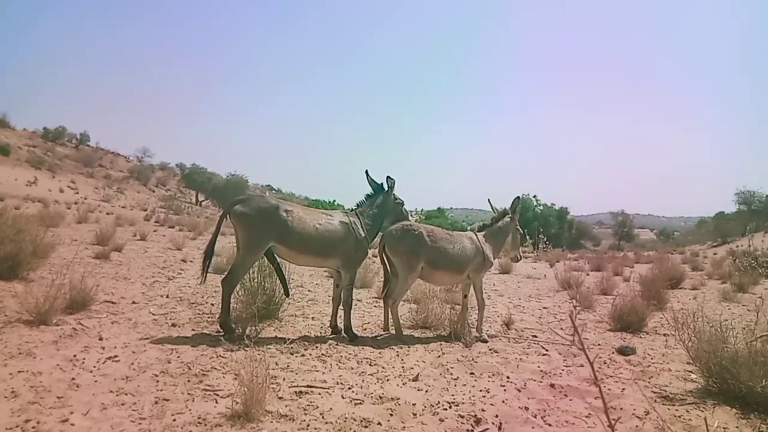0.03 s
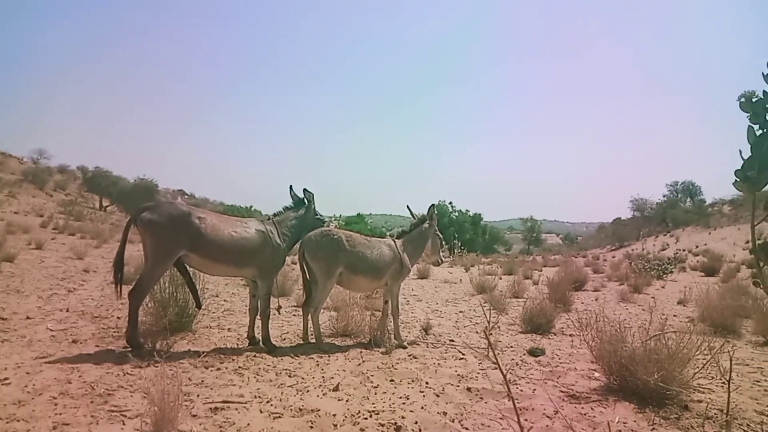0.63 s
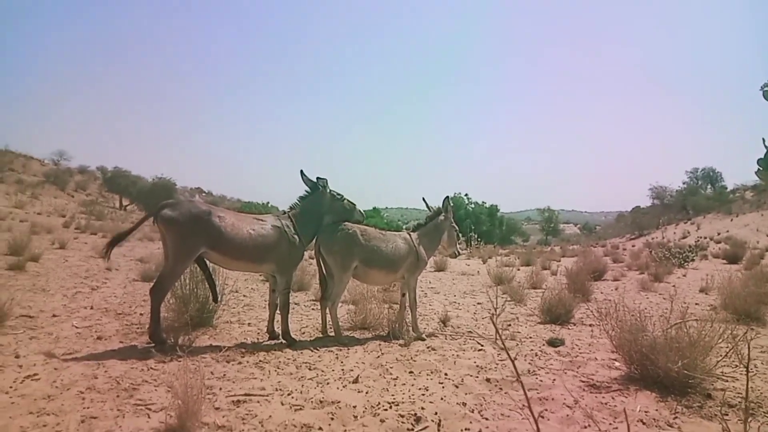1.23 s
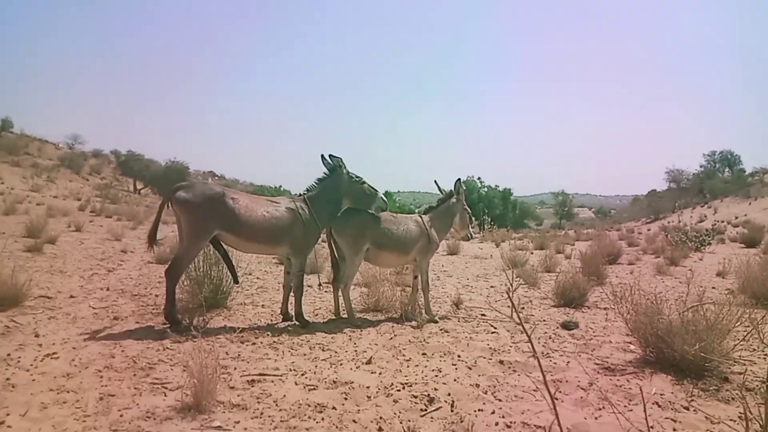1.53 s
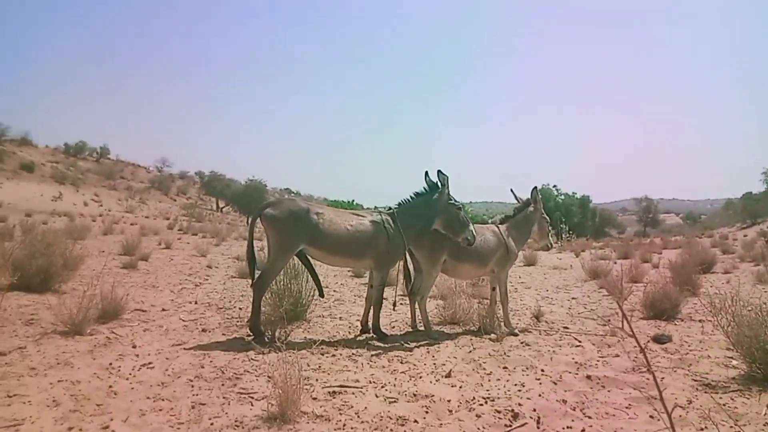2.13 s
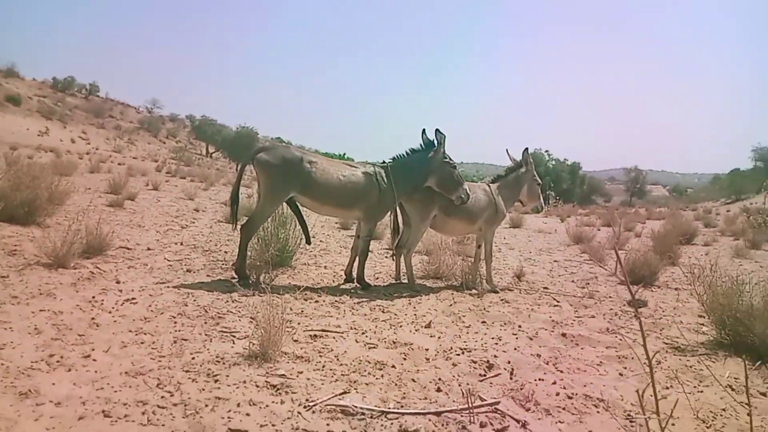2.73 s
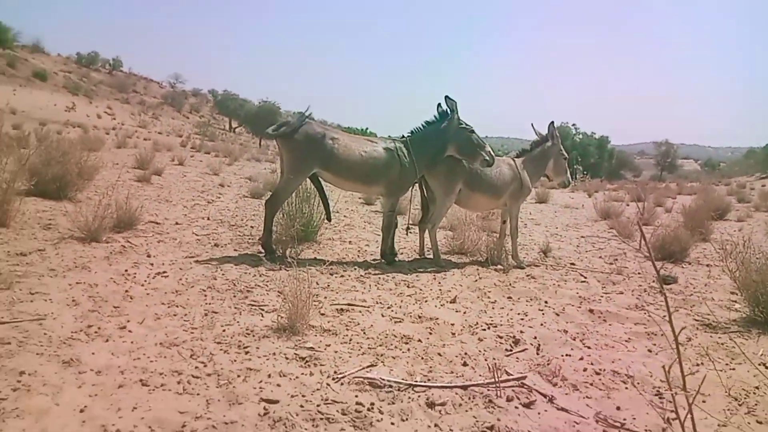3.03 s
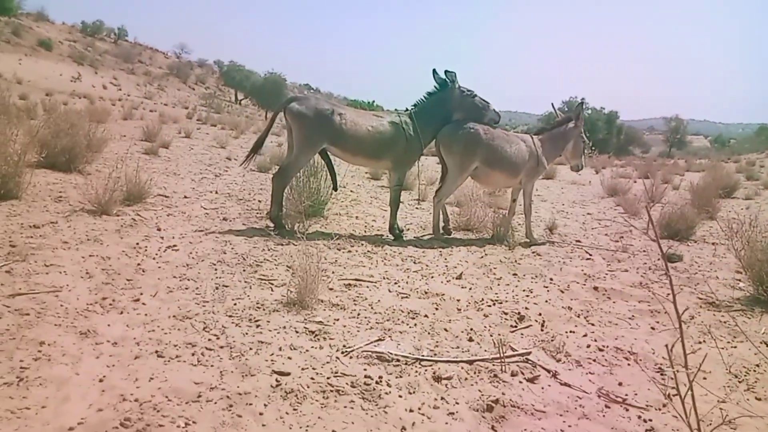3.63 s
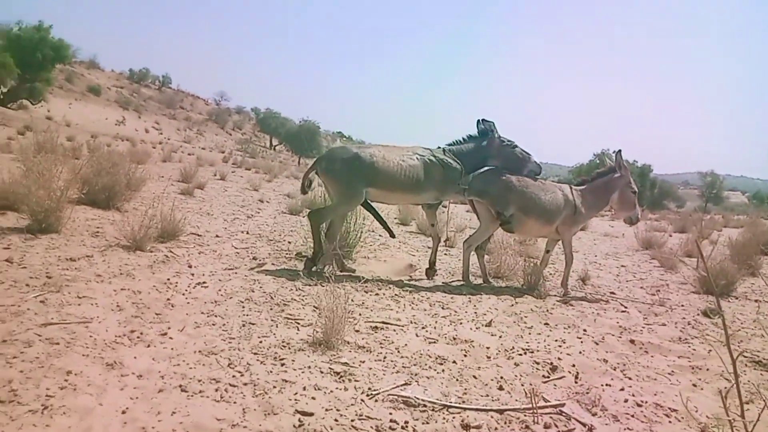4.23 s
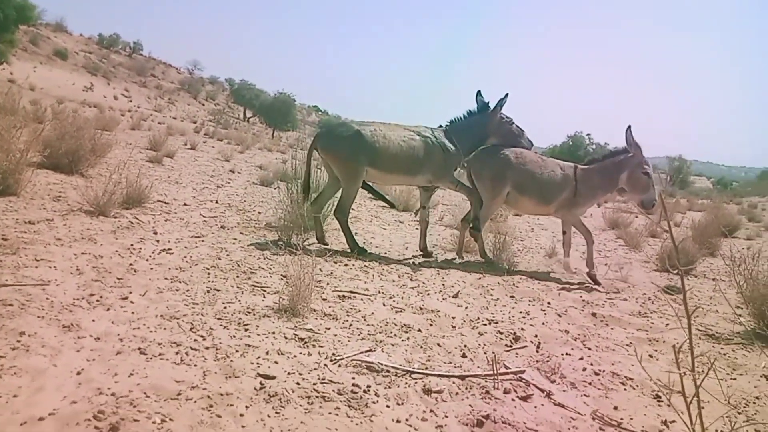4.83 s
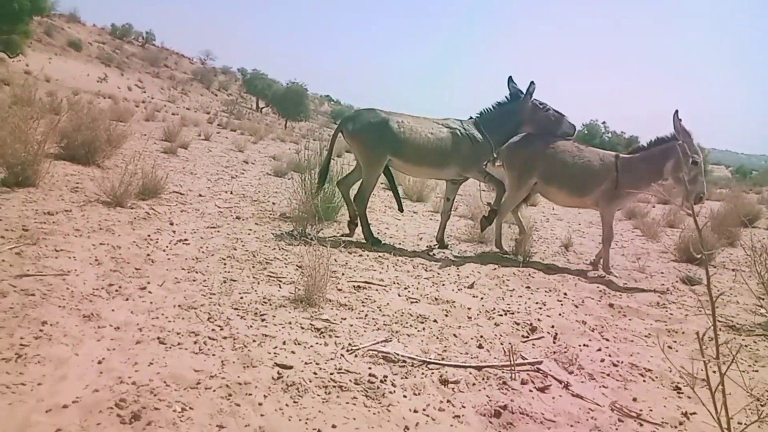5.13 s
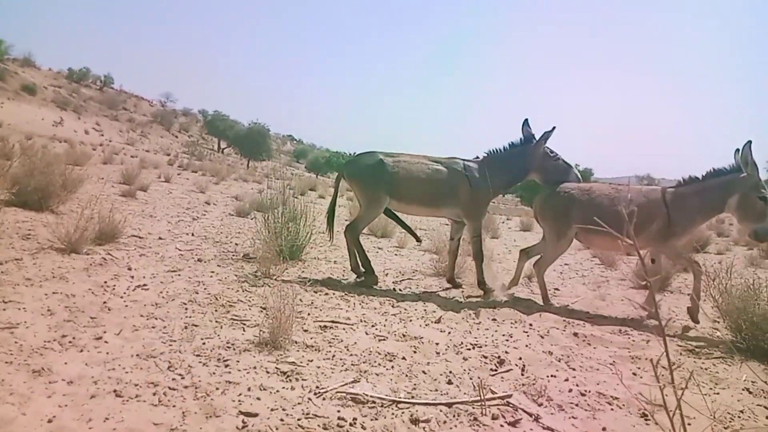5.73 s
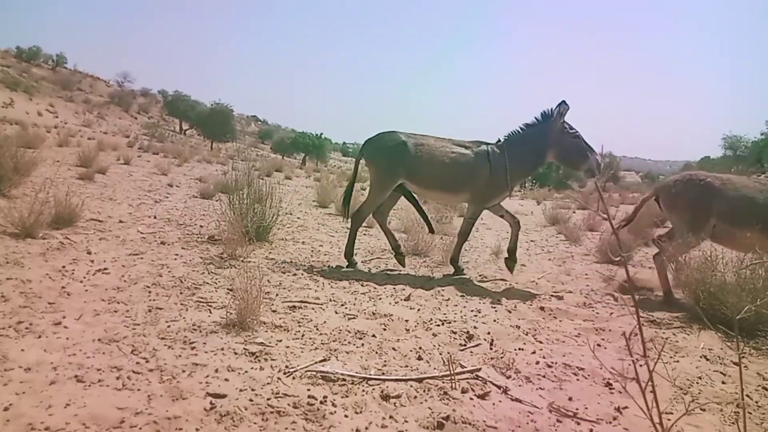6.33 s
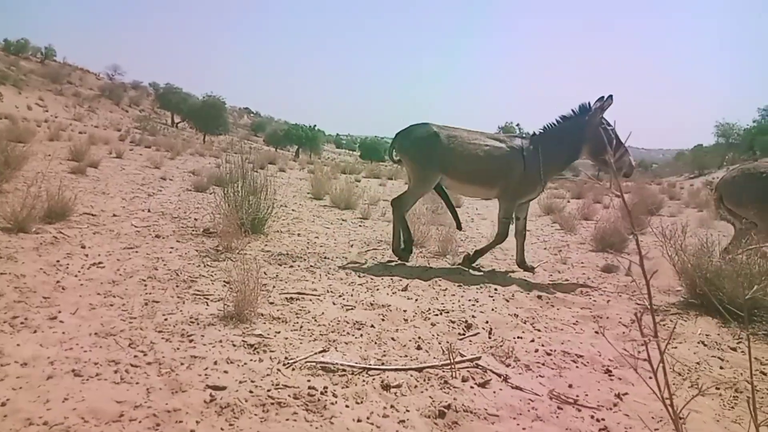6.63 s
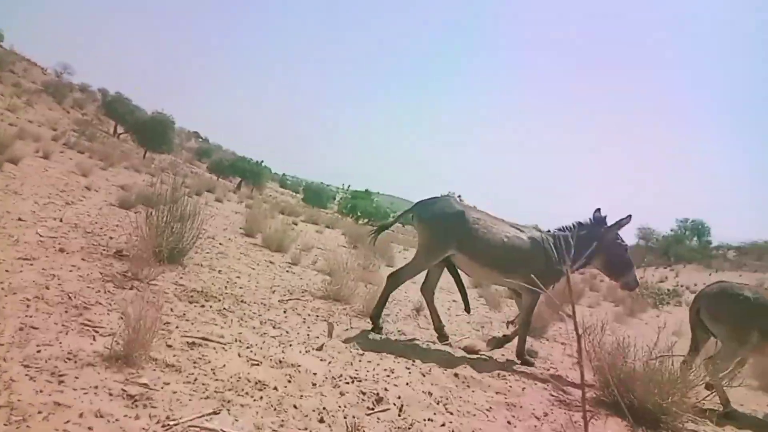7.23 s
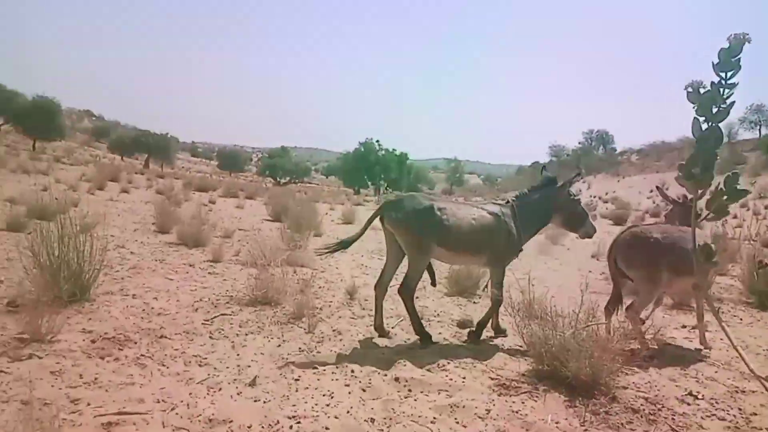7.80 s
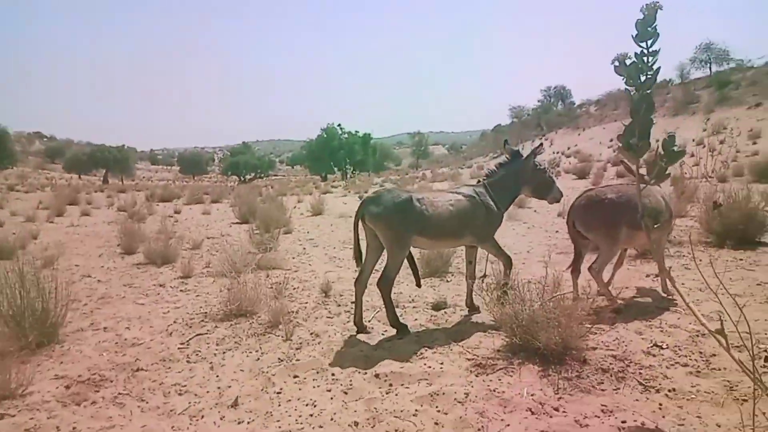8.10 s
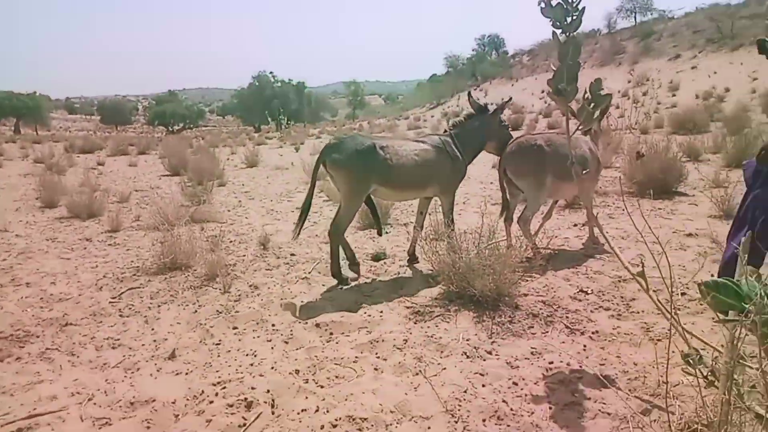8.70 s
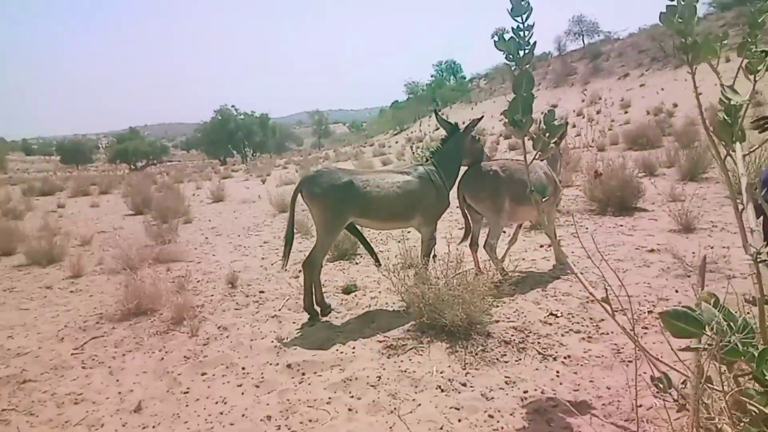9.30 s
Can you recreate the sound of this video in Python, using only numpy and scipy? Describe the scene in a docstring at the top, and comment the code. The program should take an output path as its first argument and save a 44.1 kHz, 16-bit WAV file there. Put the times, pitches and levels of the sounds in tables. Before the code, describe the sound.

Loud, hoarse hee-haws from a donkey outdoors, with thin squeals between the early calls and a little wind on the microphone.

```python
"""In open scrubland a donkey brays: a long first haw, a few thin squeals, then hee and haw in turn.
Each haw is a train of uneven pulses from the vocal folds, filtered by throat and nose, and is often
entered and left through a high clean squeal. Each hee is a whistle in rushing air as the animal
draws in. Slopes and bushes return a faint echo, and light wind buffets the microphone."""
import sys
import numpy as np
from scipy import signal
from scipy.fft import rfft, irfft, next_fast_len
from scipy.io import wavfile
from scipy.ndimage import uniform_filter1d, minimum_filter1d, map_coordinates

SR = 44100
rng = np.random.default_rng(int(sys.argv[2]) if len(sys.argv) > 2 else 0)


def waveform_to_disk(signal):
    """Save audio, clipped to [-1, 1], as 16-bit WAV at the path in sys.argv[1]."""
    frames = np.transpose(np.atleast_2d(signal))
    scaled = np.clip(frames, -1, 1) * 32767
    samples = np.round(scaled).astype(np.int16)
    wavfile.write(sys.argv[1], SR, samples)


N = 412776
T = np.arange(N) / SR

# Responses of the throat and of the brighter airway. Each row: frequency in Hz, gain in dB.
THROAT_RESPONSE = [(400, -44), (560, -14.5), (720, -16), (850, -8.5), (1020, 2), (1750, 1.5), (2080, 3),
                   (2600, -10.5), (3400, -22), (4300, -36), (5300, -64), (9000, -90)]
AIRWAY_RESPONSE = [(400, -37.5), (800, -13.5), (1200, -1.5), (2100, 8.5), (3000, -5.5), (3800, -0.5),
                   (4400, -5.5), (5000, -16.5), (5600, -31.5), (6600, -42), (9000, -70.5), (15000, -86)]


def haw(scoop_hz=31.87, droop_hz=21.98, rougher_per_s=.3, air_share=.36, surge_db=1.25):
    """Source and filter: slaps of the vocal folds excite the resonances of throat and nose."""
    # Out-breaths; a break of register takes a second row. Each row: start, length, attack and release
    # in seconds, pitch in Hz, glide in Hz/s, mouth and nose levels in dB, then flutter depth,
    # roughness and hollowness from 0 to 1.
    out_breaths = [ (-.1, 0.93, .05, .05, 348.4, 10, -16, -28, .2, 0.7, 0),
                   (.68, .305, 0.15, 0.16, 356.6, -20, -13.5, -28.5, .5, .8, 0),
                   (2.62, 0.22, 0.046, 0.068, 400.5, 150, -22, -42, 0.5, 0.9, 0),
                   (3.505, 0.4, 0.078, 0.14, 348.2, -35.5, -14.5, -23.5, 0.9, .55, 0.16),
                   (4.45, 0.43, 0.069, 0.13, 347.3, -16, -14.5, -23, .65, 0.54, 0.32),
                   (5.415, .42, 0.1, 0.11, 349.6, -42.5, -13, -24.5, 0.7, .5, 0.11),
                   (6.37, 0.52, 0.046, 0.091, 344.5, -29.5, -14.5, -27, .3, 0.67, 0),
                   (7.355, 0.5, 0.07, 0.15, 349.9, -61.5, -12.5, -28, .35, 0.69, 0),
                   (8.318, .17, 0.044, 0.061, 374.9, 0, -9.5, -24.5, 0.9, 0.4, 0.6),
                   (8.435, 0.36, 0.061, 0.045, 301.1, 53.5, -12, -35, 0.2, 0.33, 0.98),
                   (9.25, .1, 0.054, .03, 301, -2, -24, -27, 0.2, .3, 0.1), ]
    # Response of the nose. Each row: frequency in Hz, gain in dB.
    nose_response = [(70, -58), (130, -34), (185, -8.5), (235, -25.5), (265, -18.5), (330, 5.5), (450, 10),
                     (580, -17.5), (900, -61)]
    # Upper resonances of the throat. Each row: frequency in Hz, width in Hz, gain in dB.
    edge_modes = [(3100, 180, 7), (4180, 64, 0.5)]
    age, left, attack_s, release_s, hz, glide, mouth_db, nose_db, depth, rough, hollow = calls(
        out_breaths)
    # the pitch scoops up, then droops as the breath runs out
    sag_hz = scoop_hz * dying(age, life_s=.03) + droop_hz * dying(left, life_s=.07)
    pitch = (hz + glide * np.clip(age, 0, age + left) - sag_hz) * (1 + .0061 * wobble(30))
    rough = np.clip(rough + rougher_per_s * (age - left) / 2, .1, 1)
    slaps = fold_slaps(pitch, depth, rough)
    # air escapes in a puff once a cycle
    puffs = unit(rng.standard_normal(N) * (1 + np.cos(angle(pitch) - 1)) ** 2)
    source = slaps + air_share * rough * puffs
    throat = coloured(source, THROAT_RESPONSE)
    # as the animal tires, one hollow resonance takes over
    throat = throat + 1.9 * hollow * resonance(throat, hz=1260, width_hz=380)
    edge = coloured(2.6 * rough * puffs + slaps, AIRWAY_RESPONSE)
    edge = edge + sum(amp(db) * resonance(edge, mode_hz, width) for mode_hz, width, db in edge_modes)
    # the more sound leaves by the mouth instead of the nose, the brighter its edge
    edge = amp(-27 + .62 * np.clip(mouth_db - nose_db, 0, 20)) * unit(edge)
    mouth_gain = amp(mouth_db + surge_db * wobble(35))
    mouth_gain *= envelope(age, left, attack_s, release_s, fade_db_per_s=4.5)
    nose_gain = amp(nose_db) * envelope(age, left, attack_s, release_s, fade_db_per_s=6.5)
    hum = steady(coloured(source, nose_response))
    return mouth_gain * (steady(throat) + edge) + nose_gain * hum


def fold_slaps(pitch, depth, rough, tired_s=8.1):
    """Subharmonics: flutter makes every third slap strong and early, or every second once tired."""
    times = cycles(pitch)
    depth, rough = np.interp(times, T, depth), np.interp(times, T, rough)
    period = np.where(times < tired_s, 3, 2)
    slip, size, late = rng.standard_normal((len(times), 3)).T
    # the pattern slips by a beat now and then
    beat = np.arange(len(times)) + np.round(np.cumsum(.36 * rough * slip))
    flutter = depth * np.cos(2 * np.pi * beat / period)
    strength = amp(6 * flutter + 8 * rough * np.tanh(size))
    delay_s = .00008 * (rough * late / strength - flutter)  # weak slaps stray most
    return unit(pulses(times + delay_s, strength))


def hee(arch_db=8, flutter_hz=33.35, flutter_after_s=.15, flutter_rise_s=.06, overblow_db_per_hz=.004):
    """Flow-driven oscillation: air drawn through the narrowed larynx rushes and sets off a whistle."""
    # In-breaths. Each row: start, length, settling time, whistle attack and release in seconds, pitch
    # in Hz, glide in Hz/s, relative whistle and air levels in dB, air fade in dB/s, hoarseness from
    # 0 to 2, tiredness from 0 to 1.
    in_breaths = [ (2.258, .23, .06, .05, 0.046, 1840, 500.5, -15, -27, -18.5, 1.7, 0.02),
                  (3.138, .257, .045, .045, 0.055, 1873, 59.5, -9.5, -28.5, -7.5, 1, 0),
                  (4.078, 0.28, .04, .05, 0.071, 1843, 180.5, -9.5, -34, -30.5, .7, 0.08),
                  (5.083, 0.25, .035, .03, 0.063, 1842, 80.5, -13.5, -34.5, -35, 1, 0.08),
                  (6.018, 0.3, 0.043, 0.021, 0.066, 1877, -220, -13.5, -27, 7, 0.98, 0),
                  (7.04, 0.27, .033, 0.038, 0.049, 1857, -79, -11, -23.5, -5.5, .8, 0),
                  (7.965, 0.32, .04, .04, 0.066, 1934, -740, -12.5, -22, 38, 0.88, 0.8),
                  (8.882, 0.35, .04, 0.11, 0.27, 1882, -750, -16, -25.5, 48, 1.11, 1), ]
    (age, left, settle_s, attack_s, release_s, hz, glide,
     whistle_db, air_db, air_fade, hoarse, tired) = calls(in_breaths)
    progress = np.clip(age / (age + left), 0, 1)
    # a tired whistle bends less and flutters partway through the breath
    bend_hz = (1 - .38 * tired) * whistle_bend(age, left, settle_s)
    pitch = hz + glide * progress * (age + left) + bend_hz
    flutter_depth = tired * np.clip((age - flutter_after_s) / flutter_rise_s, 0, 1)
    flutter = flutter_depth * np.sin(angle(flutter_hz + 4 * wobble(20)))
    # overblowing: a higher pitch brings a stronger octave and more hoarseness
    octave_db = -2 + overblow_db_per_hz * (pitch - hz)
    hoarse = hoarse * np.clip((pitch / 1900) ** 6, .5, 2)
    waver = 1 + .009 * hoarse * wobble(260) + .006 * wobble(45)
    phase = angle(pitch * (1 + .03 * flutter) * waver)
    turbulence = hoarse * (.25 * wobble(600) + .17 * wobble(1700))
    whistle_db = whistle_db + arch_db * (np.sin(np.pi * progress) - .5) + 5 * flutter
    whistle = amp(whistle_db + 2 * hoarse * wobble(90)) * np.sin(phase) * (1 + turbulence)
    blurred_octave = amp(octave_db + 2.5 * wobble(50)) * np.sin(2 * phase + .96 * wobble(550))
    rush = amp(1 + 3.7 * wobble(110)) * noise(AIRWAY_RESPONSE)
    airflow = amp(air_db) * envelope(age, left, attack_s=.047, release_s=.05, fade_db_per_s=air_fade)
    breath = envelope(age, left, attack_s, release_s) * whistle + airflow * (blurred_octave + rush)
    return lowpass(breath, hz=8000, order=4)


def whistle_bend(age, left, settle_s, drop_hz=479.7, flick_hz=259.8):
    """Frequency glide: a whistle starts high, settles, and flicks up as the breath ends."""
    return drop_hz * np.exp(-(np.maximum(age, 0) / settle_s) ** 2) + flick_hz * dying(left, life_s=.035)


def squeal(roughness=.42):
    """Harmonic series: in their high register the folds sound an arching tone with a little air."""
    # High-register notes. Each row: start and length in seconds, first, middle and last pitch in Hz,
    # relative level in dB, octave in dB against the fundamental.
    notes = [ (.97, .275, 954, 918, 880, -32.5, 6), (1.21, .115, 840, 820, 840, -41, -2.5),
             (1.79, .04, 1244, 1190, 1160, -36, -16.5), (1.885, .14, 793, 841, 828, -27, -2.5),
             (1.985, .14, 820, 802, 803, -29.5, -8), (2.1, .045, 830, 953, 1006, -38, -15),
             (2.61, .18, 769, 808, 856, -25, -7.5), (2.76, .205, 905, 912, 849, -18.5, 0),
             (2.93, .09, 818, 775, 806, -29, -8), (3.49, .11, 723, 783, 743, -26.5, -4),
             (3.8, .16, 761, 835, 735, -34, -2), (4.445, .085, 673, 765, 790, -32, 0.5),
             (4.795, .165, 757, 826, 708, -34.5, -1), (5.41, .08, 666, 690, 797, -32.5, 4),
             (5.765, .135, 720, 788, 674, -32.5, -0.5), (6.355, .055, 592, 614, 646, -36.5, 0),
             (6.845, .08, 720, 693.6, 618.3, -39.5, 4), (7.345, 0.062, 570, 595, 660, -37, 0.5), ]
    # Harmonics from the third upward, in dB against the fundamental.
    overtones_db = [-13.5, -29.5, -26.5, -42]
    age, left, first_hz, middle_hz, last_hz, level_db, octave_db = calls(notes)
    progress = np.clip(age / (age + left), 0, 1)
    arch_hz = middle_hz - (first_hz + last_hz) / 2
    pitch = first_hz + (last_hz - first_hz) * progress + arch_hz * np.sin(np.pi * progress)
    phase = angle(pitch * (1 + .005 * wobble(150)))
    upper = sum(amp(db + 2 * wobble(25)) * np.sin(harmonic * phase)
                for harmonic, db in enumerate([octave_db, *overtones_db], start=2))
    slack = np.clip((830 / pitch) ** 6, .5, 1.2)  # slack folds make low notes rougher
    upper *= 1 + roughness * slack * wobble(380)
    hiss = amp(-21) * noise(THROAT_RESPONSE) + amp(-25.5) * rng.standard_normal(N)
    gain = amp(level_db + 6) * envelope(age, left, attack_s=.025, release_s=.032, fade_db_per_s=35.5)
    return lowpass(gain * (np.sin(phase) + upper + slack * hiss), hz=4700, order=6)


def shrill(waver=.009, shake_db=3):
    """Random modulation blurs a second, thinner whistle that rides on some in-breaths."""
    # High whistles. Each row: start and length in seconds, pitch in Hz, level in dB, octave in dB
    # against the fundamental.
    whistles = [(1.455, .26, 4784, -30, -60), (2.262, .21, 4650, -25.5, -38.5), (3.14, .14, 4560, -33, -34),
                (5.06, 0.23, 4670, -43.5, -59), (5.99, 0.19, 4570, -43, -49)]
    age, left, hz, level_db, octave_db = calls(whistles)
    pitch = hz + whistle_bend(age, left, settle_s=.043)
    phase = angle(pitch * (1 + waver * wobble(400)))
    tone = np.sin(phase) + amp(octave_db) * np.sin(2 * phase)
    gain = envelope(age, left, attack_s=.076, release_s=.078) * amp(level_db + shake_db * wobble(90))
    return gain * tone


def wheeze(rasp_db=-2, shake_db=1.3):
    """Turbulent noise, filtered by the airway: the first in-breath has no low whistle."""
    # Course of the breath. Each row: time in seconds, level in dB.
    breath_levels = [(1.38, -46), (1.46, -43), (1.54, -34.5), (1.69, -34), (1.73, -64)]
    level_db = np.interp(T, *np.transpose(breath_levels), left=-np.inf, right=-np.inf)
    air = noise(AIRWAY_RESPONSE)
    rasp = amp(rasp_db) * resonance(air, hz=2200, width_hz=600)
    return amp(level_db + shake_db * wobble(87)) * unit(air + rasp)


def creaks(throat_db=9, jitter=.27, air_share=.97):
    """Impulse excitation: uneven pulses ring the throat as the airway opens or shuts."""
    # Pulse bursts. Each row: start and nominal length in seconds, pulse rate in Hz, relative level in dB.
    bursts = [(1.753, 0.051, 366, -27), (2.143, .06, 230, -49), (2.205, .045, 280, -34),
              (2.51, 0.051, 390, -28), (3.09, 0.049, 220, -34), (3.412, 0.033, 162, -42),
              (4.025, 0.035, 190, -42.5), (5.03, 0.043, 150, -44)]
    source = np.zeros(N)
    for start, length, rate, db in bursts:
        times = np.arange(start, start + 2 * length, 1 / rate)
        late, size = rng.standard_normal((len(times), 2)).T
        slaps = pulses(times + jitter * late / rate, amp(2 * size)) * np.sqrt(SR / rate)
        swell = np.interp(T, start + length * np.array([0, .13, .5, 1.3]), [0, 1, .8, 0])
        source += amp(db) * swell * (slaps + air_share * rng.standard_normal(N))
    return amp(throat_db) * coloured(source, THROAT_RESPONSE) + coloured(source, AIRWAY_RESPONSE)


def hills(x):
    """Scattering from sand slopes and bushes gives an exponentially decaying tail."""
    # Decay of the echo. Each row: frequency in Hz, time to fall 60 dB in seconds.
    decay_times = [(300, 0.8), (1200, 0.87), (5000, 0.04)]
    hz, t, spectra = signal.stft(rng.standard_normal(SR), SR, nperseg=256)
    decay = amp(-60 * t / along(decay_times, hz)[:, None])
    tail = signal.istft(spectra * decay, SR, nperseg=256)[1]
    return signal.fftconvolve(x, tail / np.linalg.norm(tail))[:N]


def wind(lumps_db=4.5, hush_db=-57):
    """Pressure fluctuations of the wind buffet the microphone over a faint hush."""
    # Gusts and lulls. Each row: time in seconds, relative level in dB.
    gusts = [(0.0, -53.5), (0.6, -58), (1.71, -35), (1.79, -43.5), (3.16, -33), (3.34, -48), (3.42, -32),
             (4.04, -40.5), (4.09, -32), (4.69, -59), (6.11, -27), (7.05, -57), (7.07, -71.5),
             (7.35, -29.5), (7.61, -53), (7.82, -42), (8.03, -77.5), (8.24, -83.5), (8.37, -40.5),
             (8.78, -91), (9.2, -83), (9.3, -46)]
    # Spectrum of the buffeting. Each row: frequency in Hz, relative level in dB.
    buffet_spectrum = [(20, -31), (60, 0), (110, 1.5), (200, -6), (700, -29), (7000, -71.5)]
    level_db = np.interp(T, *np.transpose(gusts)) - 1 + lumps_db * wobble(14)
    return amp(level_db) * noise(buffet_spectrum) + amp(hush_db) * noise(THROAT_RESPONSE)


def calls(rows):
    """For each sample: seconds since the nearest call began, seconds left, and its other columns."""
    start, length, *columns = np.transpose(rows)
    end = start + length
    nearest = np.searchsorted((end[:-1] + start[1:]) / 2, T)
    age, left = np.maximum(T - start[nearest], -1), np.maximum(end[nearest] - T, -1)
    return [age, left] + [uniform_filter1d(column[nearest], size=200) for column in columns]


def envelope(age, left, attack_s, release_s, fade_db_per_s=0, ramp_db=26.5):
    """Amplitude envelope of a call: attack, exponentially changing hold, release."""
    edges = np.maximum(1 - age / attack_s, 0) ** 2 + np.maximum(1 - left / release_s, 0) ** 2
    gate = np.clip(1 + np.minimum(age, left) / .02, 0, 1)
    return uniform_filter1d(gate * amp(-ramp_db * edges - fade_db_per_s * np.clip(age, 0, 1)), size=200)


def dying(t, life_s):
    """Exponential decay from 1, beginning at time 0."""
    return np.exp(-np.maximum(t, 0) / life_s)


def amp(db):
    """Decibels to gain."""
    return 10 ** (np.asarray(db) / 20)


def unit(x):
    """Normalisation to rms 1."""
    return x / np.sqrt(np.mean(x ** 2) + 1e-20)


def steady(x):
    """Normalisation of the short-term rms to 1."""
    return x / np.sqrt(np.abs(uniform_filter1d(x ** 2, size=1500)) + 1e-12)


def along(points, hz):
    """Interpolation of (Hz, value) points on a log frequency axis."""
    point_hz, values = np.transpose(points)
    return np.interp(np.log(hz + 1), np.log(point_hz + 1), values)


def wobble(rate):
    """Smooth random modulation with rate knots a second."""
    knots = rng.standard_normal(int(N * rate / SR) + 4)
    grid = np.arange(0, len(knots) - 1, 1 / 8)
    return np.interp(T * rate, grid, map_coordinates(knots, [grid]))


def angle(hz):
    """Phase as the integral of frequency."""
    return 2 * np.pi * np.cumsum(hz) / SR


def cycles(hz):
    """Times at which a vibration completes each cycle."""
    turns = np.cumsum(hz) / SR
    return np.interp(np.arange(1, turns[-1]), turns, T)


def pulses(times, sizes):
    """Band-limited impulses placed between samples."""
    taps = np.floor(times * SR).astype(int)[:, None] + np.arange(-7, 9)
    lag = taps - times[:, None] * SR
    shape = np.sinc(lag) * np.sinc(lag / 8)
    return np.bincount(np.clip(taps, 0, N - 1).ravel(), (sizes[:, None] * shape).ravel(), N)


def coloured(x, points):
    """Minimum-phase filter with the given (Hz, dB) shape."""
    size = 2 * next_fast_len(N // 2 + 8192)
    cepstrum = irfft(np.log(amp(along(points, np.fft.rfftfreq(size, 1 / SR)))))
    response = np.exp(rfft(2 * cepstrum[:size // 2], size) - cepstrum[0])
    return irfft(rfft(x, size) * response)[:N]


def noise(points):
    """Coloured noise of rms 1."""
    return unit(coloured(rng.standard_normal(N), points))


def resonance(x, hz, width_hz):
    """One damped mode with gain 1 at its peak."""
    return signal.lfilter(*signal.iirpeak(hz, hz / width_hz, SR), x)


def lowpass(x, hz, order):
    """Maximally flat low-pass filter."""
    return signal.sosfilt(signal.butter(order, hz, fs=SR, output="sos"), x)


def scene(echo_db=-36):
    """Superposition of the bray, its faint echo and the wind."""
    bray = haw() + squeal() + hee() + shrill() + wheeze() + creaks()
    return (bray + amp(echo_db) * hills(bray) + wind())[None]


def record(dry, ceiling=.87, end_s=9.297, top_hz=15500):
    """Peak limiting ducks the gain smoothly; the sound stops abruptly and is band-limited."""
    needed = np.minimum(1, ceiling / (np.abs(dry) + 1e-9))
    gain = uniform_filter1d(minimum_filter1d(needed, size=221), size=201)
    cut = dry * gain * np.clip((end_s - T) / .002, 0, 1)
    return irfft(rfft(cut) * (np.fft.rfftfreq(N, 1 / SR) < top_hz), N)


dry = scene()
out = record(dry)
waveform_to_disk(out)
```